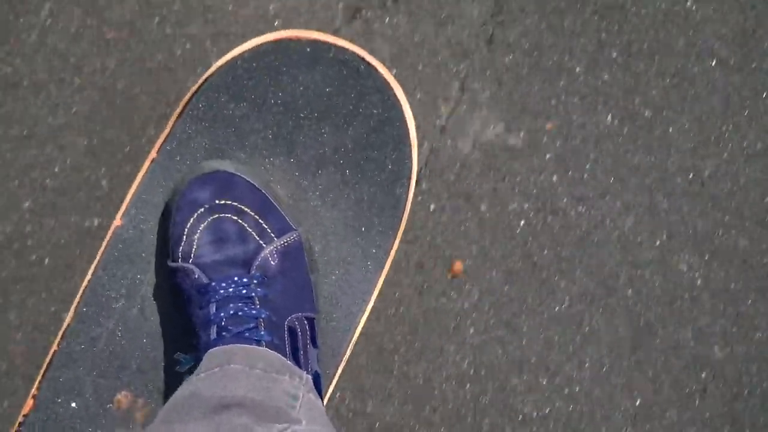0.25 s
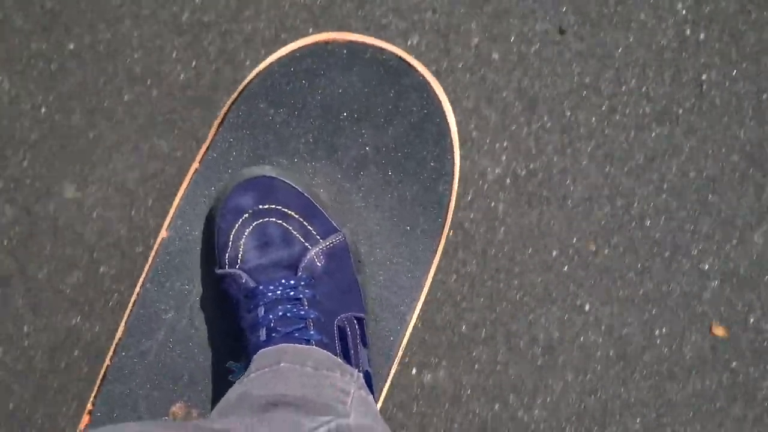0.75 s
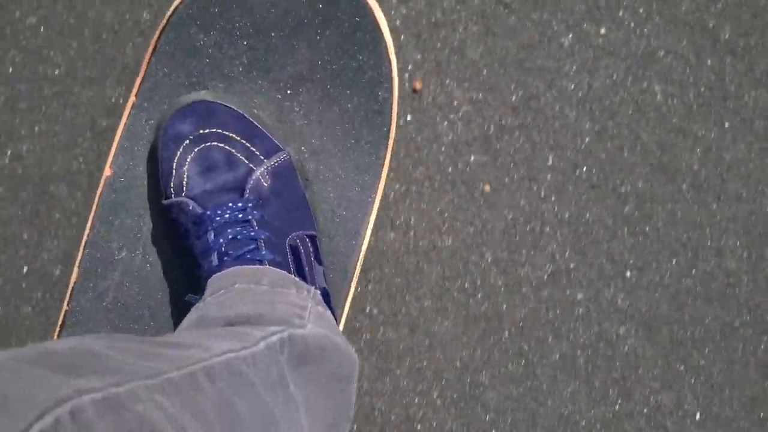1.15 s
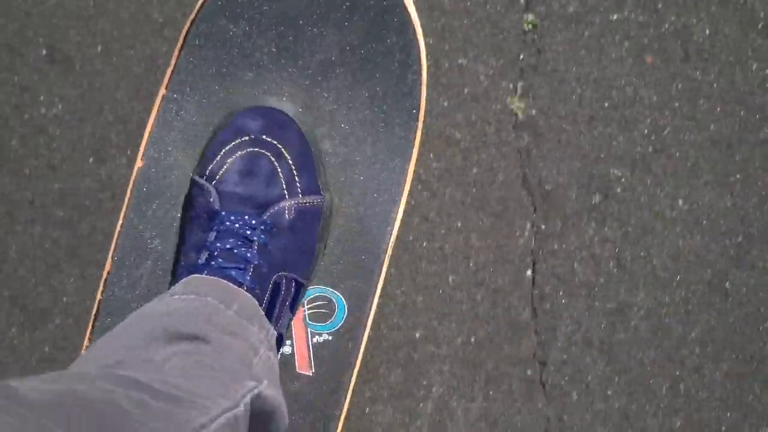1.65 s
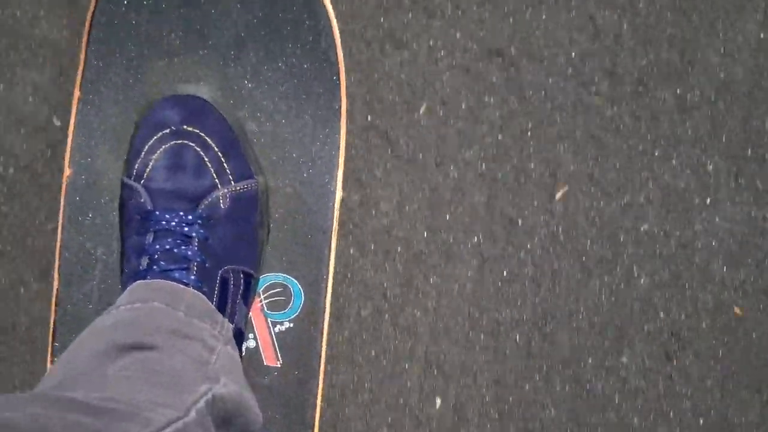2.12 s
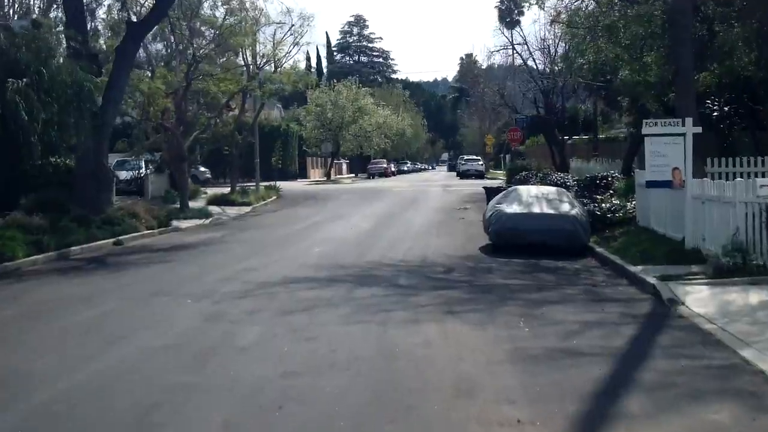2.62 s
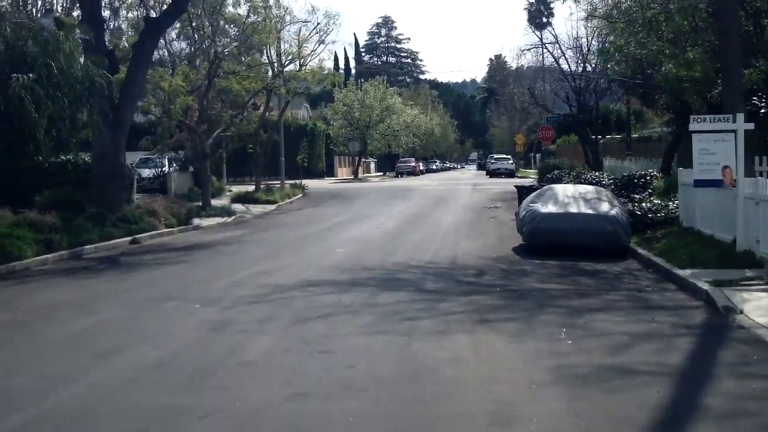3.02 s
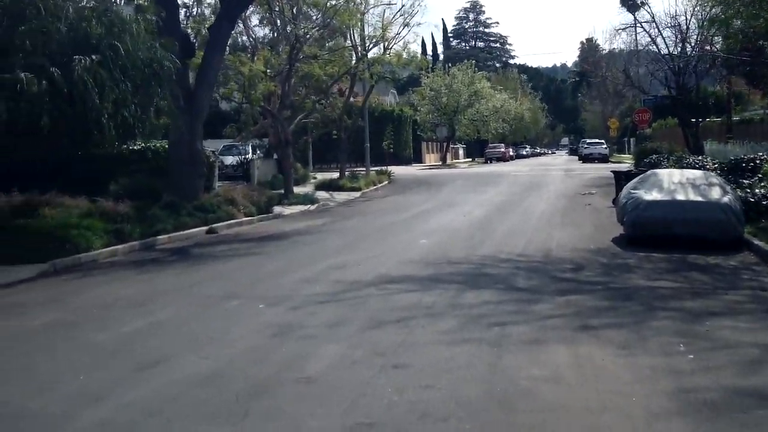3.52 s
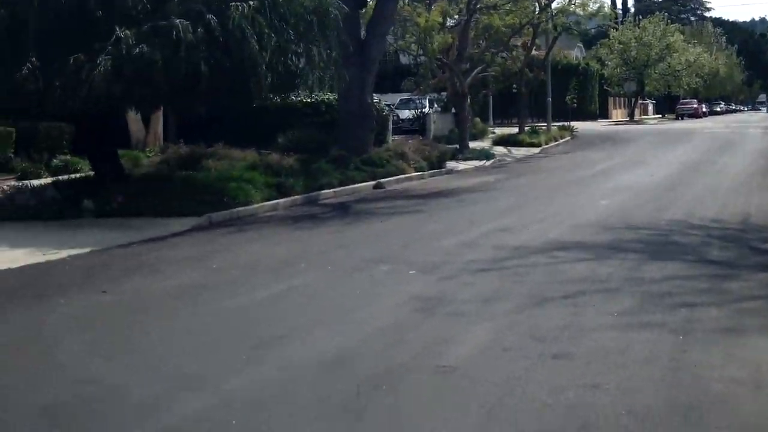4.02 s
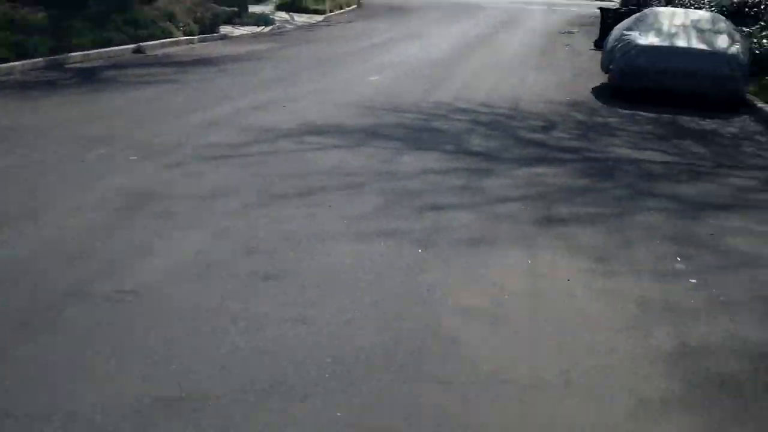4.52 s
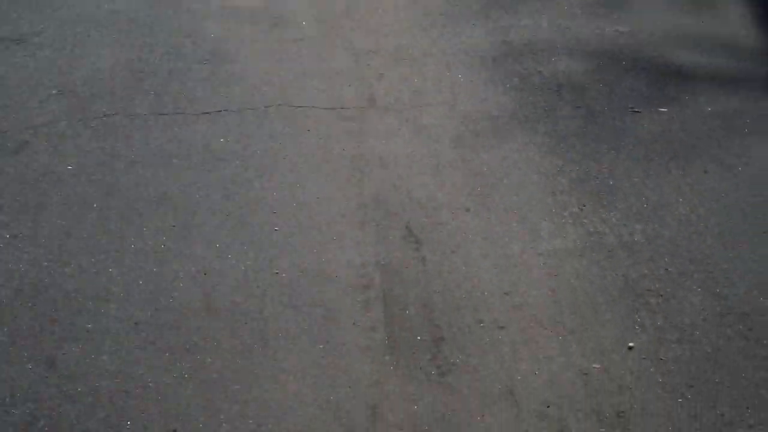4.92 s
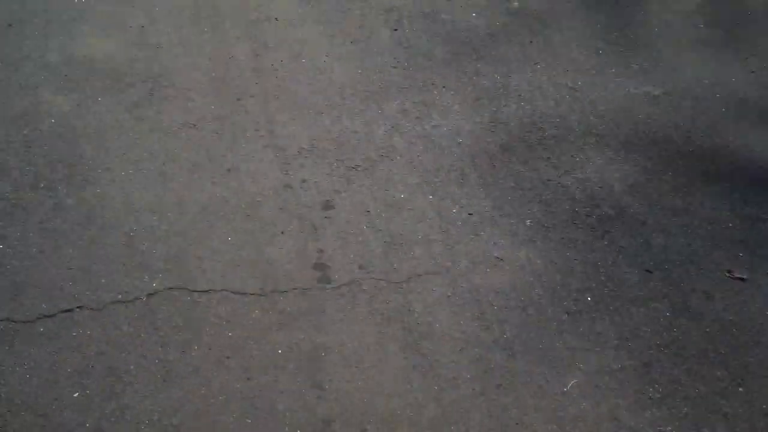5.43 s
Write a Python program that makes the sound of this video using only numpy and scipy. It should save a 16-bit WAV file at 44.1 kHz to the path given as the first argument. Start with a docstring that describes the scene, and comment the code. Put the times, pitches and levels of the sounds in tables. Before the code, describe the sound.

Close, dry outdoor sound of one skateboard rolling without pause over rough asphalt, heard from the rider's hand. A hollow, woody, uneven drumming of the deck lies under gritty truck chatter and fine wheel fizz. From the start, snapping stones and ticks stand out, with a strong double knock near 0.2 s. Irregular crack knocks follow, denser from 1 to 2 s, with pebble clicks around 1.5 to 1.8 and 2.2 s. Around 2.3 s soft low bumps mark the microphone lifting; the brightness shifts and low, lumpy wind becomes stronger. Rolling and knocks continue, with a rougher gritty burst near 4.35 s and sharp snaps at 4.4 and 4.8 s. Rolling then thins and a dull wheel growl starts at 4.8 s. From about 5.05 to 5.35 s a carve makes a harsh, raspy scrub with a noisy screech, peaking near 5.25 s, before quieter rolling and wind finish.

```python
"""A skateboard rolls down a rough asphalt street, heard from the rider's hand.
Random blows from the road grain drum the deck, chatter in the trucks (the axle mounts) and fizz in the wheels.
Cracks knock, pebbles click and grit snaps and ticks: single blows that make resonant bodies ring.
Random slips make the wheels scrub and screech through one carve, and shaped noise is the wind on the microphone."""
import sys
import numpy as np
from scipy import signal
from scipy.fft import rfft, irfft
from scipy.io import wavfile

SR = 44100
rng = np.random.default_rng(int(sys.argv[2]) if len(sys.argv) > 2 else 0)


def wav_out(sig):
    """Save sig, one row per channel (or a flat mono array), as 16-bit PCM at SR to the path in sys.argv[1]."""
    wavfile.write(sys.argv[1], SR, np.round(np.clip(np.atleast_2d(sig).T, -1, 1) * 32767).astype(np.int16))


N = 249738  # length of the scene in samples

# roughness of the asphalt, over ordinary paving: start_s, coarse_lumps_db, sharp_fine_grain_db
ROAD_ROUGHNESS = [(0.0, 2, 6), (0.19, -1.5, 0.5), (0.25, -2.5, 2), (0.36, -1, -3), (0.5, 0, 2.5),
                  (0.7, -1, 1.5), (0.84, 0.5, 3), (1.06, 3, 6), (1.2, -1.5, 2), (1.27, 1.5, 4),
                  (1.46, 0.5, 3.5), (1.5, 2, 3.5), (1.69, 1.5, 6.5), (1.765, -1, 4.5), (1.8, -4.5, 0.5),
                  (1.97, -2, 1), (2.07, -2, 0), (2.2, -1, 2.5), (2.25, -1.5, 3.5), (2.37, -1.5, -1.5),
                  (2.43, -1.5, 5.5), (2.52, -1, -1.5), (2.59, 2, 1.1), (2.73, -1.3, 3.5), (2.81, 1, 4),
                  (2.92, 1.5, 1.5), (3.03, -2, 0.8), (3.25, 1, 1.5), (3.32, -4, 1), (3.48, 1, 0),
                  (3.53, 1, 10.5), (3.6, 1, 0.5), (3.75, -1, 0), (3.82, 2.5, 4.5), (3.86, -3.5, -0.5),
                  (3.94, -2.1, -2), (4.06, -0.5, 5), (4.14, -0.5, -1), (4.35, 2.5, 8.5), (4.52, -7, -2),
                  (4.58, -4, 1), (4.62, -4.5, -1), (4.665, -6, 1.5), (4.7, -10, 0.5), (4.77, -3, -1),
                  (4.81, -9, -5), (4.98, -7, 0), (5.04, -6, 1), (5.4, -4, -0.5), (5.47, -8, -1),
                  (5.54, -5.5, 2.5), (5.605, -22, -5.5), (5.65, -1.5, 2)]
# colour of the deck: pitch_hz, level_db (per Hz)
DECK_COLOUR = [(30, -50), (90, -41), (150, -13), (220, -9), (280, -6.5), (325, -2.5), (385, -16.5),
               (490, -4.5), (590, -2.5), (675, 0), (810, -12), (1050, -19), (1400, -26), (2200, -41),
               (4000, -78.5)]
# resonances of trucks and wheels: pitch_hz, width_hz, level_above_deck_db, level_microphone_lifted_db
TRUCK_RESONANCES = [(1035, 180, 5, 5.5), (1228, 240, 2.5, 0.5), (1557, 390, -4, 0), (1790, 310, -4, -27.5),
                    (1985, 240, -6, -9), (2242, 370, -17, -9), (2640, 530, -24, -19.5),
                    (3070, 120, -25, -23.5), (3300, 590, -26.5, -43.5)]
# fine fizz of wheels and bearings: pitch_hz, level_above_deck_db, level_microphone_lifted_db (per Hz)
BEARING_COLOUR = [(1500, -27, -14), (3300, -3.5, -0.5), (3900, -5.5, -2), (4440, 4.5, 7.5),
                  (5300, -1.5, -11), (5770, -16, -13), (6700, -17.5, -7.5), (8650, -27, -29.5),
                  (15000, -33.5, -22)]
# the microphone is lifted from above the deck towards the street ahead: start_s, lifted_share (0-1)
MICROPHONE_LIFT = [(2.28, 0.31), (2.35, 0.85)]
# how hard the rider leans into the carve: start_s, lean_share (0-1)
RIDER_LEAN = [(4.93, 0.0), (5.05, 0.31), (5.09, 0.74), (5.19, 0.7), (5.255, 0.97), (5.31, 0.82),
              (5.355, 0.11), (5.45, 0.01)]
# strength of the wind on the microphone outside the carve: start_s, level_db
WIND_STRENGTH = [(0.0, -55.5), (0.45, -61), (0.85, -49.5), (1.82, -66), (2.18, -47.5), (2.3, -45),
                 (3.35, -40), (3.45, -46.5), (3.53, -40), (4.2, -39), (4.55, -42.5), (5.66, -42)]
# colour of the wind on the microphone: pitch_hz, level_db (per Hz)
WIND_COLOUR = [(10, -14.5), (35, -4.5), (80, -2.5), (150, -2), (250, -1), (600, -48), (2000, -81)]
# colour of the faint hiss: pitch_hz, level_db (per Hz)
HISS_COLOUR = [(100, 4.5), (4000, 5.5), (8000, -5), (15000, -1.5)]
# soft low bumps on the microphone: middle_s, peak_db, pitch_hz, length_s (each side of the middle)
MICROPHONE_BUMPS = [(2, -27.5, 105, 0.089), (2.262, -36, 112, 0.078), (2.302, -21.5, 112, 0.055),
                    (2.429, -27.5, 76, .05), (2.493, -30.5, 62, .07), (3.109, -30, 65, .05),
                    (4.056, -28, 60.5, .06)]
# stones shot out from under a wheel: start_s, peak_db
STONE_SNAPS = [(0.0219, -30), (0.038, -19.5), (0.1437, -38), (0.1857, -30.5), (1.279, -26), (1.598, -37),
               (2.184, -39), (4.441, -21.5), (4.7685, -20), (4.8673, -25.5), (5.261, -29), (5.274, -38),
               (5.287, -40)]
# colour of a stone's snap: pitch_hz, level_db (per Hz)
SNAP_COLOUR = [(500, -33), (1300, -25.5), (1900, 8.5), (2500, 1.5), (3200, -5), (3750, -17), (4300, -20),
               (5200, -29), (6400, -29), (8000, -47), (15000, -59)]
# the sharpest of the thin ticks of grit: start_s, peak_db
GRIT_TICKS = [(0.0577, -39), (.147, -45), (0.219, -51), (0.1886, -29.5), (0.8115, -42), (0.8848, -40),
              (0.972, -35.5), (1.096, -41), (1.2785, -46), (1.4486, -44), (1.945, -42), (2.5866, -42),
              (2.9917, -37), (3.5114, -37.5), (3.6024, -42), (3.6897, -38.5), (3.819, -34), (4.3064, -38.5),
              (5.1774, -40), (5.302, -36.5), (5.404, -34.5), (5.513, -38.5)]
# colour of a tick: pitch_hz, level_db (per Hz)
TICK_COLOUR = [(500, -6.5), (3000, 9.5), (7000, 5), (15000, -4)]
# wheels dropping into cracks and pits: start_s, peak_db, hardness_db, pitch_hz, rebound_db (over the landing)
CRACK_KNOCKS = [(0.0383, -16, 0, 850, -6), (.0408, -15, -7, 610, -9), (0.1853, -5, -6, 663, -7.5),
                (.588, -25.5, 9, 720, 5), (.781, -26.5, 9.5, 704, -5), (0.988, -16, -13, 613, -3),
                (1.041, -13, -12.5, 630, -10), (1.0599, -15, -10, 595, -10), (1.145, -18.5, -2.5, 595, 4.5),
                (1.2784, -13.5, -0.5, 900, -20), (1.2805, -18, -7, 530, -10), (1.398, -16, -3.5, 660, -14),
                (1.578, -15, -5.5, 630, -6.5), (1.641, -10.5, -13, 630, -16), (1.679, -22, 6.5, 650, -9),
                (1.7662, -13, -9.5, 654, -17), (1.945, -19.5, -3, 715, 2), (1.9874, -15, -9.5, 684, -1),
                (2.027, -13.5, -13, 656, -6.5), (2.185, -19.5, 1, 666, -3), (2.399, -17, -12, 670, -16),
                (2.4113, -14.5, -10, 690, -7), (2.5608, -16.5, -9, 614, -4), (2.590, -15.5, -14.5, 651, -8),
                (2.810, -13.5, -18, 670, -8.5), (3.195, -15.5, -28, 685, -5), (3.475, -14.5, -18, 640, -9),
                (3.5093, -14.5, -11.5, 670, -3.5), (3.621, -19, -13.5, 687, 2),
                (3.6862, -10.5, -8.5, 673, -14), (3.7144, -18.5, -16, 640, -2), (3.8212, -11, 0, 670, -17),
                (4.052, -14.5, -7, 600, -1), (4.2197, -16, -7, 740, -4), (4.331, -12.5, -14, 655, -15),
                (4.4292, -13.5, -9, 630, -2), (4.566, -13, -6, 620, -4), (4.7529, -9.5, -30, 820, -25),
                (4.8612, -11, -27, 746, -27), (5.0258, -15.5, -5, 770, -14), (5.100, -14, -11, 800, -3),
                (5.1623, -14, -9, 750, -12), (5.2206, -12, -6, 734, -14), (5.249, -8.5, -9, 700, -17),
                (5.4225, -12, -9, 786, -2.5), (5.4908, -16.5, -32, 860, -19), (5.5119, -17, -17, 771.5, -3),
                (5.636, -21.5, -6, 740, -3.5)]
# colour of a knock: multiple_of_its_pitch, level_db (per Hz)
KNOCK_COLOUR = [(.15, -33.5), (.62, -11.5), (1.0, 1.5), (1.25, -7.5), (1.65, -17), (2.4, -38), (4.6, -64.5),
                (12, -105)]
# pebbles caught under a wheel, and near 0.19 s a loose washer ringing after the hard landing: start_s,
# truck_click_db, ping_db (peaks)
CAUGHT_PEBBLES = [(0.1872, -30, -31.5), (0.194, -29, -46), (0.415, -33.5, -62), (0.502, -31, -64),
                  (.781, -34, -51), (0.862, -31, -49.5), (.873, -36, -44), (.926, -39, -51),
                  (0.956, -27, -48), (1.042, -26, -50), (1.071, -28, -47), (1.145, -26, -45),
                  (1.155, -28, -43), (1.217, -39, -48), (1.330, -30.5, -44.5), (1.396, -35, -42.5),
                  (1.510, -21.5, -53), (1.568, -26, -52), (1.587, -29, -46.5), (1.624, -32, -46),
                  (1.681, -21, -48), (1.719, -23.5, -50), (1.745, -37, -51), (1.765, -25.5, -52),
                  (1.782, -30, -56), (1.928, -30, -66), (1.987, -32, -58), (2.034, -40, -45),
                  (2.17, -31, -52), (2.184, -22, -51), (2.203, -32, -51), (2.215, -25, -51),
                  (2.433, -26, -59), (2.454, -27, -60), (2.793, -27.5, -54), (3.07, -26, -62),
                  (3.37, -34, -61), (3.525, -29, -62), (3.548, -27.5, -58), (3.565, -31, -59),
                  (3.650, -29, -61), (3.986, -34, -58), (4.233, -22.5, -55), (4.428, -23, -63),
                  (4.482, -28, -68), (4.579, -25, -62), (4.654, -31.5, -66), (5.088, -19, -50),
                  (5.114, -20, -47), (5.231, -22, -53), (5.25, -21, -49), (5.274, -24, -50),
                  (5.287, -17, -52), (5.304, -23, -53), (5.39, -35, -55), (5.422, -26, -49),
                  (5.513, -30, -55)]
# ping of a wheel crushing grit: pitch_hz, width_hz, level_db
PING_RESONANCES = [(3120, 540, 4.5), (3480, 210, 0.5), (4540, 520, -4.5)]
# resonances of a scrubbing wheel: pitch_hz, width_hz, level_db
SCRUB_RESONANCES = [(294, 64, 8.5), (478, 164, 5.5), (640, 420, -11), (893, 260, 5.5), (1300, 340, -2),
                    (1490, 110, -1), (1834, 350, -8.5), (2290, 130, -18), (2530, 370, -16),
                    (3450, 640, -33.5), (4830, 1200, -46), (6700, 1100, -61.5)]
# resonances of a wheel at the limit of its grip: pitch_hz, width_hz, level_db
SCREECH_RESONANCES = [(1860, 300, 0.7), (2260, 220, 0.59), (2530, 200, -2.3)]
# colour of sand sprayed by a sliding wheel: pitch_hz, level_db (per Hz)
SPRAY_COLOUR = [(2500, -13), (3600, 0.5), (4900, 0.5), (5800, -7.5), (6900, -9.5), (8500, -18.5),
                (15000, -26.5)]

# rolling: levels before the rider leans, on ordinary paving
DECK_DB, CHATTER_DB, FIZZ_DB = -26, -41.5, -76.5
FIZZ_GROWTH = 0.88  # dB of fizz per dB of fine grain
CRACKLE_PER_S, CRACKLE_DB = 110, -69  # crushed sand, before the microphone is lifted
DECK_WANDER = 0.008  # typical share by which the deck's resonances move as the rider's weight shifts
# how strongly loudness (dB) and pitch (share) of a resonance vary with the spot a stone strikes
SPOT_DB, SPOT_DETUNE = 5.5, 0.05
# wind: the turn takes the microphone out of it
CARVE_LEE_DB = -10  # at full lean
# grit
FAINT_TICKS_PER_S, FAINT_TICKS_DB = 7.5, -82.5
SNAP_BOUNCE_S, SNAP_BOUNCE_DB = 0.002, -9.5  # a shot stone hits once more
SNAP_BODY_DB = -10  # the wheel that shot it rings
# knocks
REBOUND_S = 0.009  # typical time until a wheel lands again
RATTLE_LAG_S, RATTLE_S = 0.00037, 0.0014  # a truck's first contact, and typical time between contacts
RATTLE_DB, RATTLE_FADE_DB = -5.5, -3  # first contact; change with each further contact
# the carve: the wheels first slide lightly, then scrub as the rider leans
SLIDE_S, SLIDE_RISE_S, SLIDE_DB = 4.78, 0.04, -35
LEAN_DB = -26.5  # scrubbing added at full lean
SCRUB_RISE = 0.054  # share by which the screech rises from no lean to full lean; the scrub rises half as far
SCREECH_DB = -32  # at full lean
SPRAY_PER_S, SPRAY_DB = 700, -66  # level at full lean
EDGE_HZ = 15850  # upper limit of the whole sound


def amp(db):
    """Turns decibels into a gain."""
    return 10 ** (np.asarray(db) / 20)


def evened(x):
    """Scales a sound to an average strength (rms) of one."""
    return x / np.sqrt(np.mean(x ** 2) + 1e-20)


def add(mix, s, sound):
    """Mixes a sound in, starting at time s in seconds."""
    part = mix[max(round(s * SR), 0):][:len(sound)]
    part += sound[:len(part)]


def curve(rows, axis=1):
    """Draws straight lines through one column of a table, giving a value for every sample."""
    rows = np.asarray(rows)
    return np.interp(np.arange(N) / SR, rows[:, 0], rows[:, axis])


def lifted():
    """How far the microphone has been lifted, 0-1, for every sample."""
    return np.clip(curve(MICROPHONE_LIFT), 0, 1)


def lean():
    """How hard the rider presses into the carve, 0-1, for every sample."""
    return np.clip(curve(RIDER_LEAN), 0, 1)


def flutter(low_hz, high_hz):
    """Random unevenness that wavers at rates between two limits, with an rms of one."""
    f = np.fft.rfftfreq(N, 1 / SR)
    band = (f > low_hz) * (f < high_hz)
    return evened(irfft(rfft(rng.standard_normal(N)) * band, N))


def grains(per_s, spread_db):
    """Blows at random moments, many small and a few large, with an rms of one."""
    size = amp(spread_db * np.minimum(rng.exponential(1, N), 4))
    direction = rng.choice([-1, 1], N)
    struck = rng.random(N) < per_s / SR
    return evened(size * direction * struck)


def ring(colour, size=4096):
    """How a body with this colour answers a single blow: nothing before it, and a peak of one."""
    hz, db = np.transpose(colour)
    f = abs(np.fft.fftfreq(size, 1 / SR))
    log_gain = np.log(amp(np.interp(np.log(f + 1), np.log(hz), db)))
    # the Hilbert transform finds the phase that lets the body answer at once (minimum phase)
    spectrum = np.exp(np.conj(signal.hilbert(log_gain)))
    response = np.fft.ifft(spectrum).real[:size // 2]
    return response / abs(response).max()


def through(drive, colour):
    """A steady drive heard through a body, with an rms of one."""
    return evened(signal.oaconvolve(drive, ring(colour))[:N])


def resonances(hz, width, db):
    """The colour of a set of resonances that sound together; their powers add."""
    f = np.geomspace(20, SR / 2, 600)
    power = (amp(db) / (1 + (2 * (f[:, None] - hz) / width) ** 2)) ** 2
    return np.transpose([f, 10 * np.log10(power.sum(axis=1))])


def bend(x, ratio):
    """Plays a steady sound faster or slower by a changing ratio, which moves all its resonances."""
    return np.interp(np.cumsum(ratio) % N, np.arange(N), x)


def truck_ring(drive, damping):
    """Blows ring the trucks, whose colour depends on where the microphone is; more damping widens resonances."""
    hz, width, above_db, lifted_db = np.transpose(TRUCK_RESONANCES)
    above, ahead = (signal.oaconvolve(drive, ring(resonances(hz, damping * width, db)))[:N]
                    for db in (above_db, lifted_db))
    return (1 - lifted()) * above + lifted() * ahead


def scattered_ring(drive, damping, count=8):
    """Stones strike different spots of the four wheels, and each spot favours other truck resonances."""
    hz, width, above_db, lifted_db = np.transpose(TRUCK_RESONANCES)
    spot = rng.integers(0, count, N)
    offsets = rng.standard_normal((count, 2, len(hz)))
    offsets = offsets - offsets.mean(axis=0)
    out, lift = np.zeros(N), lifted()
    for k, (louder, higher) in enumerate(offsets):
        spot_hz = hz * (1 + SPOT_DETUNE * higher)
        for db, share in ((above_db, 1 - lift), (lifted_db, lift)):
            colour = resonances(spot_hz, damping * width, db + SPOT_DB * louder)
            out += signal.oaconvolve(drive * share * (spot == k), ring(colour))[:N]
    return out


def contact(skip_s, dip):
    """A wheel skips over the gap just before it knocks, so the rolling thins for a moment."""
    t = np.arange(N) / SR
    gaps = sum(np.exp(-((t - s + skip_s / 2) / skip_s) ** 2) for s, *_ in CRACK_KNOCKS)
    return 1 - np.clip(dip, 0, 1) * np.minimum(gaps, 1)


def rolling():
    """Stones strike the wheels; the same blows drum the deck and shake the trucks, and sand crackles."""
    stones = grains(per_s=1800, spread_db=2.0)
    load = flutter(low_hz=44, high_hz=100.0)  # the wheels press and lighten as they bounce

    drumming = (0.86 * stones + 0.69 * rng.standard_normal(N)) * amp(0.21 * load)
    deck = through(drumming, DECK_COLOUR)
    deck = bend(deck, 1 + DECK_WANDER * flutter(low_hz=0.8, high_hz=6))

    chatter = (0.38 * stones + grains(per_s=1500, spread_db=1.0)) * amp(0.65 * load)
    gravel = grains(per_s=170, spread_db=0.8)  # coarser stones set the trucks ringing a little longer
    chatter_ring = evened(truck_ring(chatter, damping=0.92))
    gravel_ring = evened(scattered_ring(gravel, damping=0.62))
    trucks = evened(chatter_ring + gravel_ring)

    sand = (0.2 * stones + 0.35 * gravel + grains(per_s=730, spread_db=0.5)) * amp(2.9 * load)
    above, ahead = (through(sand, np.array(BEARING_COLOUR)[:, [0, k]]) for k in (1, 2))
    bearings = (1 - lifted()) * above + lifted() * ahead

    crushed = grains(per_s=CRACKLE_PER_S, spread_db=2.0)
    crackle = through(crushed, resonances(*np.transpose(PING_RESONANCES))) * (1 - lifted())

    clumps_db = 1.4 * flutter(low_hz=14, high_hz=60)  # sharp grain lies in clumps
    lumps_db = curve(ROAD_ROUGHNESS, axis=1)
    grain_db = curve(ROAD_ROUGHNESS, axis=2) + clumps_db
    patches = amp(0.63 * flutter(low_hz=3.2, high_hz=18))  # small patches of coarser and smoother paving
    pressure = lean()  # leaning into the carve loads the wheels
    board = deck * amp(DECK_DB + lumps_db + 2.0 * pressure)
    board += trucks * amp(CHATTER_DB + grain_db - 3.4 * lifted() + 7.0 * pressure)
    board += crackle * amp(CRACKLE_DB + grain_db)
    board += bearings * amp(FIZZ_DB + FIZZ_GROWTH * grain_db - 2.9 * lifted() + 16.0 * pressure)
    return contact(skip_s=0.008, dip=0.3) * patches * board


def air():
    """Lumpy wind noise and soft low bumps on the microphone, over a faint hiss."""
    wind_db = curve(WIND_STRENGTH) + CARVE_LEE_DB * lean()
    gusts = amp(1.4 * flutter(low_hz=3.5, high_hz=11.0))
    out = through(rng.standard_normal(N) * gusts, WIND_COLOUR) * amp(wind_db)
    rumble = through(rng.standard_normal(N), WIND_COLOUR)
    for s, db, hz, length in MICROPHONE_BUMPS:
        t = np.arange(-length, length, 1 / SR)
        push = np.cos(2 * np.pi * hz * t) * np.exp(-(6.9 * t / length) ** 2)
        # turbulence outlasts the blunt push
        turbulence = 0.28 * rumble[round(s * SR):][:len(t)] * np.hanning(len(t))
        add(out, s - length, amp(db) * (push + turbulence))
    hiss = through(rng.standard_normal(N), HISS_COLOUR)
    return out + amp(-74.0 + 3.1 * lifted()) * hiss


def grit():
    """Stones snap out from under the wheels and bounce, among thin ticks."""
    out, kicks = np.zeros(N), np.zeros(N)
    snap, tick = ring(SNAP_COLOUR), ring(TICK_COLOUR)
    for s, db in STONE_SNAPS:
        add(out, s, amp(db) * snap)
        add(out, s + SNAP_BOUNCE_S * rng.uniform(0.8, 1.3), amp(db + SNAP_BOUNCE_DB) * snap)
        add(kicks, s, [amp(db + SNAP_BODY_DB)])
    for s, db in GRIT_TICKS:
        add(out, s, amp(db) * tick)
    faint_ticks = through(grains(per_s=FAINT_TICKS_PER_S, spread_db=1.0), TICK_COLOUR)
    return out + truck_ring(kicks, damping=0.26) + amp(FAINT_TICKS_DB) * faint_ticks


def knocks():
    """A wheel lands in a crack and rebounds; a short blow rings higher, a hard landing rattles the truck."""
    landings, rattles = np.zeros((2, N))
    for s, db, hard_db, hz, rebound_db in CRACK_KNOCKS:
        knock = ring(np.array(KNOCK_COLOUR) * [hz, 1])
        add(landings, s, amp(db) * knock)
        add(landings, s + REBOUND_S * rng.uniform(0.9, 1.1), amp(db + rebound_db) * knock)
        # a few quick, dying contacts
        for k, (late, side) in enumerate(rng.uniform(-1, 1, (4, 2))):
            delay = RATTLE_LAG_S + RATTLE_S * k * (1 + late / 4)
            contact_db = db + hard_db + RATTLE_DB + RATTLE_FADE_DB * k
            add(rattles, s + delay, [np.sign(side) * amp(contact_db)])
    return landings + truck_ring(rattles, damping=0.8)


def pebbles():
    """Each pebble clicks through the trucks and pings the wheel as it is pressed out; near 0.19 s a loose
    washer rings the same way."""
    clicks, pings = np.zeros((2, N))
    hz, width, db = np.transpose(PING_RESONANCES)
    for s, click_db, ping_db in CAUGHT_PEBBLES:
        add(clicks, s, [amp(click_db)])
        struck_db = db + SPOT_DB * rng.standard_normal(len(hz))
        add(pings, s, amp(ping_db) * ring(resonances(hz, width, struck_db)))
    return scattered_ring(clicks, damping=1.1) + pings


def scrub():
    """The wheels catch and slip in the carve: a dull growl at first, a rasp when pressed hard."""
    slips = grains(per_s=2600, spread_db=2.2) * amp(2.6 * flutter(low_hz=60, high_hz=170))
    rasp = through(slips, resonances(*np.transpose(SCRUB_RESONANCES)))
    low_pass = signal.butter(4, 1650, fs=SR, output="sos")
    growl = signal.sosfiltfilt(low_pass, rasp)
    t = np.maximum(np.arange(N) / SR - SLIDE_S, 0)
    slide = np.minimum(t / SLIDE_RISE_S, 1) * amp(SLIDE_DB)
    pressure = lean()
    scrape = growl + pressure ** 0.5 * (rasp - growl)
    scrape = bend(scrape, 1 + SCRUB_RISE * (pressure - 0.5) / 2)
    return scrape * (slide + amp(LEAN_DB) * pressure)


def screech():
    """At the deepest lean the wheels let go in a dense run of bright slips and spray sand."""
    slips = grains(per_s=970, spread_db=4.0)
    squeal = through(slips, resonances(*np.transpose(SCREECH_RESONANCES)))
    squeal = bend(squeal, 1 + SCRUB_RISE * (lean() - 1))
    spray = through(grains(per_s=SPRAY_PER_S, spread_db=4.5), SPRAY_COLOUR)
    return squeal * amp(SCREECH_DB) * lean() ** 3.5 + spray * amp(SPRAY_DB) * lean()


def scene():
    """The board and the air, in one channel."""
    board = rolling() + grit() + knocks() + pebbles() + scrub() + screech()
    return (board + air())[None]


def record(dry):
    """Takes away the sound above the upper limit with a steep low-pass filter."""
    low_pass = signal.firwin(511, EDGE_HZ, window=("kaiser", 9), fs=SR)
    return signal.oaconvolve(dry, low_pass[None], "same")


dry = scene()
out = record(dry)
wav_out(out)
```